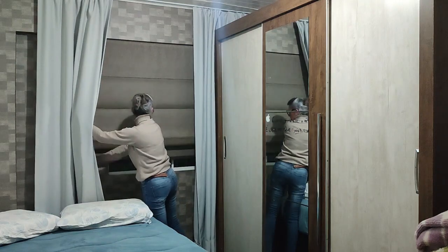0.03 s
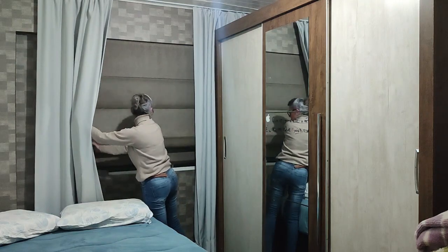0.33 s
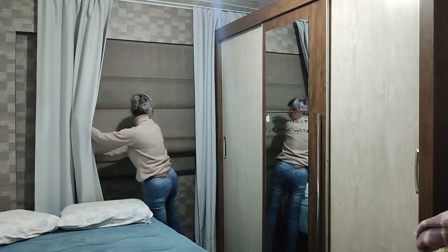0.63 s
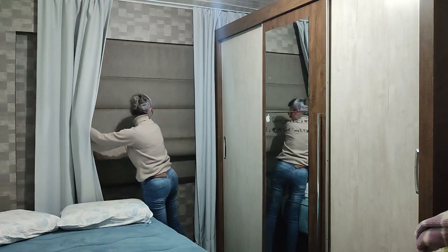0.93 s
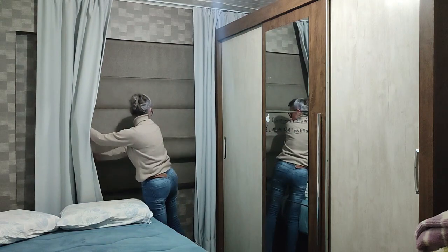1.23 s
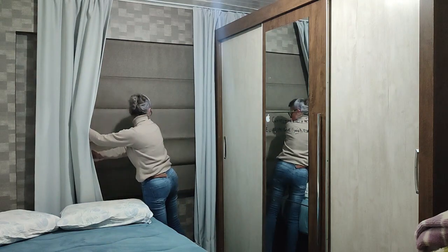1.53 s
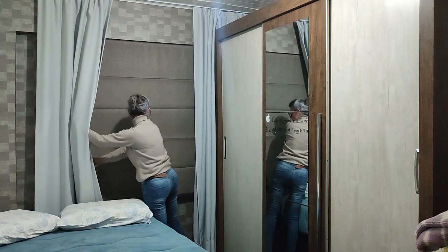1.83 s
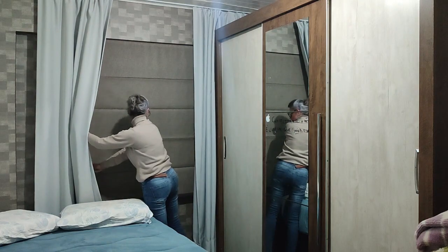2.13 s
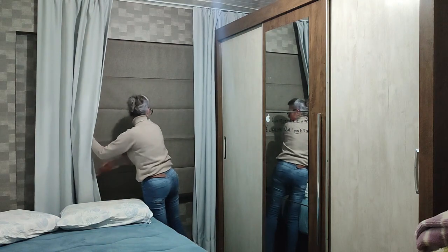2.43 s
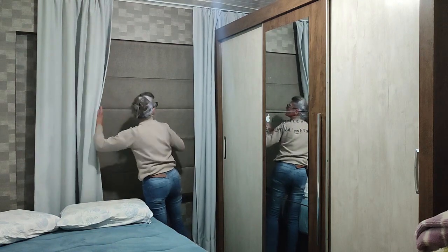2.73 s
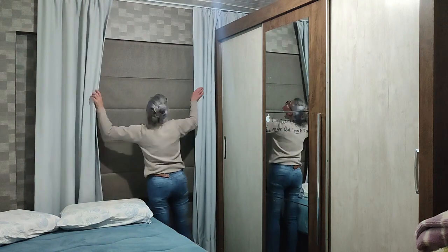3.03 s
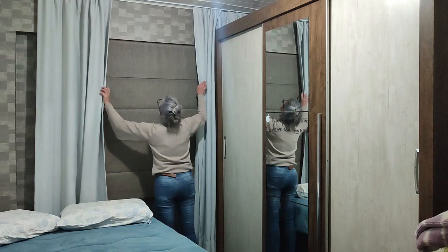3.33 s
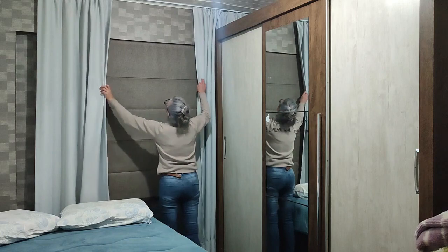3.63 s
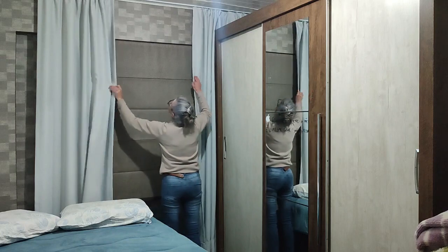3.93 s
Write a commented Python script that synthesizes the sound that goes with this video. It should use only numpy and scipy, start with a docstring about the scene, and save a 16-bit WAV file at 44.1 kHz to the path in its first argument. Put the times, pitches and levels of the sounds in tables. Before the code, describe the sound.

A roller shutter rasps and rumbles down in four strokes, then curtains rustle.

```python
"""Lowering a roller shutter

A shutter is let down by its strap in four strokes, a few metres away in a small, quiet bedroom.
Stick-slip friction makes the strap rasp and whirr in its guide; the slats rumble, scrape and once
knock together. The released strap snaps against its box, and small clicks and curtain rustles
follow, over faint hiss and a low rumble."""
import sys
import numpy as np
from scipy import signal
from scipy.fft import rfft, irfft
from scipy.io import wavfile
from scipy.ndimage import uniform_filter1d

SR = 44100
rng = np.random.default_rng(int(sys.argv[2]) if len(sys.argv) > 2 else 0)


def dump(signal):
    """Clip the signal to [-1, 1] and save it as 16-bit WAV at the path in sys.argv[1]."""
    limited = np.clip(np.atleast_2d(signal).T, -1, 1)
    pcm = np.round(limited * 32767).astype(np.int16)
    wavfile.write(sys.argv[1], SR, pcm)


N = 176400

# friction envelopes, one table per stroke (t/s, relative rasp level/dB, relative slat level/dB)
STROKE_LEVELS = [
    [(0, -35, -35), (.02, -37, -34), (.03, -34, -26), (.052, -32, -22), (.065, -37, -28), (.09, -41, -31),
     (.115, -54, -37), (.15, -62, -39), (.18, -66, -46)],
    [(.39, -60, -55), (.415, -52, -48), (.432, -50, -30), (.47, -42, -39), (.497, -38, -25.5),
     (.52, -39, -35), (.55, -37, -37), (.61, -34, -32), (.645, -37, -36), (.68, -32, -28), (.712, -34, -33)],
    [(1.04, -62, -54), (1.09, -38, -42), (1.132, -41, -27), (1.16, -33, -26), (1.187, -34, -29),
     (1.206, -36, -41), (1.222, -31, -41), (1.26, -39, -38), (1.314, -43, -37), (1.345, -58, -50),
     (1.42, -64, -50)],
    [(1.6, -62, -65), (1.644, -45, -41), (1.665, -38, -38), (1.76, -40, -40), (1.8, -37, -39),
     (1.845, -39, -39), (1.885, -53, -44), (1.908, -37.5, -40), (1.953, -40, -40), (1.97, -53, -43),
     (2.03, -70, -60)],
]
# normal modes of the shutter and its box (f/Hz, relative level/dB, T60/s)
SHUTTER_MODES = [(178, -11, .24), (215, -15, .16), (290, -6, .14), (333, -9, .15), (440, -4, .12),
                 (592, -4, .11), (652, -2, .1), (732, -1, .09), (795, -4, .11), (950, 1, .11),
                 (1287, -4, .12), (1943, -12, .12)]


def undb(db):
    """Amplitude ratio of a level in decibels."""
    return 10 ** (np.asarray(db) / 20)


def clock():
    """Sample times in seconds."""
    return np.arange(N) / SR


def curve(rows, column):
    """Amplitude envelope interpolated along a column of levels, zero outside their span."""
    rows = np.array(rows)
    return undb(np.interp(clock(), rows[:, 0], rows[:, column], left=-np.inf, right=-np.inf))


def burst(start, decay_s):
    """Impact envelope: a step onset and exponential decay."""
    age = clock() - start
    return (age >= 0) * np.exp(-np.abs(age) / decay_s)


def swells(rows):
    """Sum of Gaussian envelopes, each falling to 1/e one half-width from its peak."""
    return sum(undb(db) * np.exp(-((clock() - peak) / width) ** 2) for peak, db, width in rows)


def through(x, response):
    """Convolution with an impulse response scaled to unit energy."""
    return signal.fftconvolve(x, response / np.linalg.norm(response))[:N]


def colour(x, points, size=8192):
    """Minimum-phase filter of a given spectral shape, made by folding the cepstrum."""
    hz, db = np.array(points).T
    f = np.fft.rfftfreq(size, 1 / SR)
    magnitude = undb(np.interp(np.log(f + 1), np.log(hz), db))
    cepstrum = irfft(np.log(magnitude))
    cepstrum[1:size // 2] *= 2
    cepstrum[size // 2 + 1:] = 0
    return through(x, irfft(np.exp(rfft(cepstrum))))


def band(x, low_hz, high_hz):
    """Band-pass filter that conserves the power of white noise."""
    sos = signal.butter(2, [low_hz, high_hz], "band", fs=SR, output="sos")
    return signal.sosfilt(sos, x) * np.sqrt(SR / 2 / (high_hz - low_hz))


def ring(x, modes):
    """Modal superposition: a struck body responds with a sum of damped sinusoids."""
    t = np.arange(SR) / SR
    response = sum(undb(db) * np.exp(-np.log(1000) * t / t60) * np.sin(2 * np.pi * (hz * t + rng.random()))
                   for hz, db, t60 in modes)
    return through(x, response)


def walk(rate):
    """Smoothed Gaussian noise of unit variance, varying over about 1/rate seconds."""
    span = int(SR / rate)
    smooth = uniform_filter1d(uniform_filter1d(rng.standard_normal(N), span), span)
    return smooth / smooth.std()


def grains(rate, spread_db=0):
    """Stick-slip friction as a Poisson train of impulses, rate per second, with unit rms."""
    slips = (rng.random(N) < rate / SR) * rng.choice([-1, 1], N)
    impulses = slips * undb(spread_db * rng.standard_normal(N))
    return impulses / impulses.std()


def whirr(rows, ratio, overtone_db):
    """Friction tone of two harmonics at ratio times the listed f, jittering in pitch and level."""
    times, hz, _ = np.array(rows).T
    pitch = ratio * np.interp(clock(), times, hz) * (1 + .068 * walk(425))
    phase = 2 * np.pi * np.cumsum(pitch) / SR
    amplitude = np.sqrt(2) * curve(rows, 2) * undb(3 * walk(260))
    return amplitude * (np.sin(phase) + undb(overtone_db) * np.sin(2 * phase))


def diffuse():
    """Diffuse noise field at two receivers: coherent at long wavelengths, incoherent at short ones."""
    f = np.fft.rfftfreq(N, 1 / SR)
    coherence = .88 * np.exp(-(f / 640) ** 2)
    mid, side = (irfft(rfft(rng.standard_normal(N)) * np.sqrt((1 + sign * coherence) / 2), N)
                 for sign in (1, -1))
    return np.array([mid + side, mid - side])


def background():
    """Ambient diffuse field: faint hiss over a low rumble."""
    # spectra (f/Hz, relative level/dB)
    hiss_spectrum = [(53, -30), (90, 0), (183, 0), (208, -3), (259, -3), (301, -6.5), (365, -7.5),
                     (473, -9), (612, -10), (4630, -20.5), (15500, -27.5)]
    rumble_spectrum = [(4, 8), (10, 5), (22, -5), (31, -8), (42, 0), (58, -3), (75, -13), (120, -21),
                       (250, -42), (1000, -75)]
    # envelope of the rumble (t/s, level/dB)
    rumble_levels = [(0, -32), (1.8, -36), (2.3, -34.5), (2.7, -40.5), (4, -41)]
    hiss = np.array([colour(side, hiss_spectrum) for side in diffuse()])
    rumble = np.array([colour(side, rumble_spectrum) for side in diffuse()])
    return undb(-49) * hiss + rumble * undb(np.interp(clock(), *np.array(rumble_levels).T))


def echoes(x):
    """Reverberation of a furnished room: absorption damps the treble sooner than the bass."""
    low_t60_s, high_t60_s, onset_s = .25, .14, .0027
    t, noise = clock(), diffuse()
    low = signal.sosfilt(signal.butter(1, 900, fs=SR, output="sos"), noise)
    tail = low * np.exp(-np.log(1000) * t / low_t60_s)
    tail += (noise - low) * np.exp(-np.log(1000) * t / high_t60_s)
    return np.array([through(x, side[:SR]) for side in tail * np.clip(t / onset_s, 0, 1)])


def bedroom(x, room_db):
    """Direct plus reverberant field; sound from the window reaches the left earlier and louder."""
    lag_s, left_lead_db, direct_db, shift_hz = .00022, 3, -2.8, 5
    # a steady crossfade of two responses stands for the echo paths that a moving shutter alters
    turn = 2 * np.pi * shift_hz * clock()
    room = echoes(x * np.cos(turn)) + echoes(x * np.sin(turn))
    direct = np.array([x, np.pad(x, (int(lag_s * SR), 0))[:N]])
    balance = undb([[left_lead_db / 2], [-left_lead_db / 2]])
    return undb(direct_db) * direct * balance + undb(room_db) * room


def curtains():
    """Sliding cloth radiates friction noise; light taps excite the modes of the runners."""
    # rustles (peak t/s, level/dB, half-width/s)
    rustles = [(2.194, -57, 0.38), (2.405, -48, 0.034), (2.53, -56.5, 0.06), (2.597, -44, 0.0097),
               (2.742, -51, 0.067), (2.91, -59, 0.091)]
    # spectrum of the cloth (f/Hz, relative level/dB)
    cloth_spectrum = [(150, -5), (600, 0.5), (1200, 4), (2200, 5), (3200, -3), (5000, -3), (8000, -11),
                      (11000, -20), (15500, -8)]
    # taps of the runners (t/s, level/dB)
    taps = [(2.521, -51), (2.591, -36), (2.603, -36), (2.793, -43.5)]
    # modes of a runner (f/Hz, relative level/dB, T60/s)
    runner_modes = [(1120, 3, .1), (1380, -14, .04), (2130, 5, .07)]
    force = rng.standard_normal(N) * sum(undb(db) * burst(t, decay_s=.0036) for t, db in taps)
    cloth = colour(grains(rate=3200) * swells(rustles), cloth_spectrum)
    return cloth + ring(force, runner_modes)


def clicks():
    """Small impacts of strap and slats radiate decaying noise in three bands."""
    # clicks (t/s, body level/dB, middle level/dB, treble level/dB, decay time/s)
    impacts = [(.19, -26, -48, -48, 0.0037), (0.347, -49, -40, -41, 0.0037), (.938, -30, -40, -42, 0.0057),
               (1.064, -25, -46, -42, 0.0028), (1.467, -31.5, -63, -39, 0.0067),
               (1.533, -46, -44, -44, 0.022), (2.069, -30, -48, -45, 0.0023),
               (2.077, -45, -35.5, -49, 0.0036), (2.704, -54, -50, -44.5, 0.029),
               (3.499, -70, -63, -51, 0.0046), (3.85, -44.5, -47.5, -66, 0.008)]
    attack_s = .00054
    noise = rng.standard_normal(N)
    envelopes = np.zeros((3, N))
    for start, *levels, decay_s in impacts:
        attack = np.clip((clock() - start) / attack_s, 0, 1)
        envelopes += np.outer(undb(levels), attack * burst(start, decay_s))
    body, middle, treble = noise * envelopes
    return band(body, 170, 1100) + band(middle, 1350, 3200) + band(treble, 6860, 8450)


def clack():
    """Impact with rebounds: the released strap hits its box, each contact opening with a hard snap."""
    # contacts (t/s, relative level/dB)
    contacts = [(2.4025, -27.5), (2.408, -29), (2.4115, -34), (2.417, -36), (2.423, -35), (2.43, -37)]
    # spectrum of a contact (f/Hz, relative level/dB)
    spectrum = [(100, -23), (280, -1.5), (600, -1.5), (1400, 3), (2200, -1.5), (3300, 0), (5000, -9.5),
                (7800, -4.5), (9500, -24), (15500, -17)]
    decay_s, snap_s, snap_db = .0019, .0003, 9
    force = sum(undb(db) * (burst(t, decay_s) + undb(snap_db) * burst(t, snap_s)) for t, db in contacts)
    return undb(-2) * colour(rng.standard_normal(N) * force, spectrum)


def knocks():
    """Impulsive excitation: slats drop onto each other with a crack and set the shutter ringing."""
    # collisions (t/s, relative level/dB)
    collisions = [(.568, -25), (.673, -25), (.717, -10.5), (.723, -15), (.729, -12.5), (.737, -18),
                  (.745, -22), (.759, -22), (.768, -21.5)]
    # spectrum of the crack (f/Hz, relative level/dB)
    spectrum = [(50, -45), (110, -22), (170, -8), (400, -5), (700, 0), (950, 1), (1350, -5), (2000, -14),
                (3000, -17), (6000, -28), (15000, -45)]
    blows = rng.standard_normal(N) * sum(undb(db) * burst(t, decay_s=.0039) for t, db in collisions)
    return undb(2) * colour(blows, spectrum) + undb(-14.5) * ring(blows, SHUTTER_MODES)


def scrapes():
    """Coarse stick-slip: where the slats bind in their rails, they slip in very uneven steps."""
    # moments of binding (peak t/s, level/dB, half-width/s)
    binds = [(0.503, -33, .017), (0.54, -37, 0.014), (1.16, -28, 0.03), (1.925, -41, 0.028)]
    return band(grains(rate=2000, spread_db=10.5) * swells(binds), 1600, 2600)


def slats():
    """Forced vibration: slats chatter down their rails and shake the box, then rub on faintly."""
    # rubbing between strokes, one table per pause (t/s, level/dB)
    settling = [
        [(.17, -67), (.23, -45.5), (.27, -47), (.32, -46.5), (.39, -50)],
        [(.76, -32), (.84, -38.5), (.92, -44), (.97, -40), (1.04, -55)],
    ]
    # spectra (f/Hz, relative level/dB)
    chatter_spectrum = [(60, -37.5), (170, -4), (300, -7.5), (480, 2), (650, 4), (800, 0), (1050, -6),
                        (1400, -8), (2100, -7.5), (2800, -13.5), (4500, -37), (12000, -34)]
    rub_spectrum = [(100, 2), (250, 2), (650, -1), (1000, -5), (2200, -9), (6000, -22), (15000, -39)]
    chatter = grains(rate=1100) * sum(curve(rows, 2) for rows in STROKE_LEVELS)
    rub = grains(rate=2200) * sum(curve(rows, 1) for rows in settling)
    resonance = undb(-9.5) * ring(chatter, SHUTTER_MODES)
    return undb(.5) * colour(chatter, chatter_spectrum) + resonance + colour(rub, rub_spectrum)


def friction_tones():
    """Periodic friction: the weave's pitch follows the strap's speed; the loaded roller groans once."""
    # glides of the weave, one table per run (t/s, nominal f/Hz, relative level/dB)
    weave_glides = [
        [(.02, 1100, -44), (.05, 820, -31), (.075, 480, -31), (.105, 280, -35), (.15, 150, -42),
         (.21, 115, -42), (.33, 108, -45), (.44, 104, -54)],
        [(.478, 1400, -42), (.5, 1270, -34), (.53, 1040, -34), (.552, 950, -32), (.575, 810, -26),
         (.595, 770, -32), (.62, 790, -33), (.65, 850, -31), (.685, 810, -35), (.71, 700, -40)],
        [(1.17, 1380, -40), (1.2, 1320, -36), (1.225, 1070, -31), (1.25, 850, -32), (1.262, 580, -30),
         (1.29, 540, -28), (1.312, 490, -28), (1.328, 450, -42)],
    ]
    # glide of the roller (t/s, nominal f/Hz, relative level/dB)
    roller_glide = [(1.105, 400, -40), (1.133, 430, -27), (1.16, 480, -24.5), (1.186, 505, -23.5),
                    (1.196, 500, -44)]
    weave = sum(whirr(rows, ratio=.99, overtone_db=-13.5) for rows in weave_glides)
    lower_groan = whirr(roller_glide, ratio=.94, overtone_db=-18)
    upper_groan = undb(-6) * whirr(roller_glide, ratio=1.36, overtone_db=-4)
    return undb(-.7) * (weave + lower_groan + upper_groan)


def grit():
    """Sparse stick-slip: single fibres catch on the guide and let go with tiny bright ticks."""
    ticks = grains(rate=220, spread_db=3) * sum(curve(rows, 1) for rows in STROKE_LEVELS)
    return undb(-5) * band(ticks, 4450, 12100)


def strap():
    """Dense stick-slip: the webbing's slips over its guide merge into an uneven broadband rasp."""
    # spectrum of the rasp (f/Hz, relative level/dB)
    spectrum = [(100, -51), (350, 0), (1000, -2), (2100, 8.5), (3100, 3), (4000, 3.5), (5000, -2),
                (7500, 4.5), (10500, -28), (12500, -8.5), (15500, -15.5)]
    effort = sum(curve(rows, 1) for rows in STROKE_LEVELS) * undb(2.2 * walk(200))
    return undb(4) * colour(grains(rate=3500) * effort, spectrum)


def scene():
    """Superposition of shutter and curtains, heard in the bedroom, on the ambient field."""
    noises = strap() + grit() + slats() + scrapes() + knocks() + clack() + clicks() + curtains()
    return bedroom(noises, room_db=.3) + bedroom(friction_tones(), room_db=-6.5) + background()


def record(dry):
    """Band limiting: a steep elliptic low-pass removes the highest treble."""
    cutoff_hz = 15600
    return signal.sosfilt(signal.ellip(10, .2, 80, cutoff_hz, fs=SR, output="sos"), dry)


dry = scene()
out = record(dry)
dump(out)
```